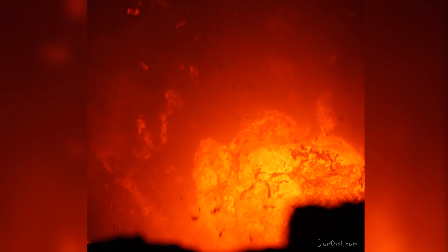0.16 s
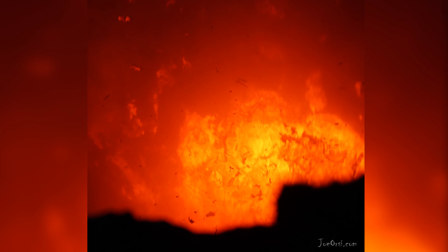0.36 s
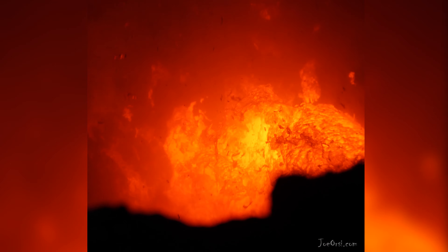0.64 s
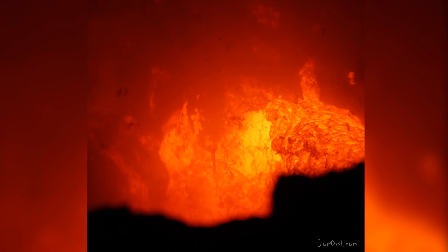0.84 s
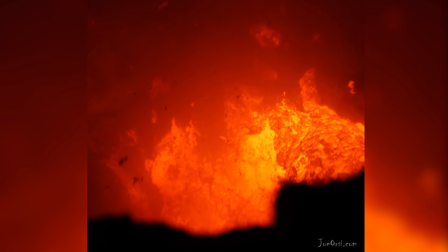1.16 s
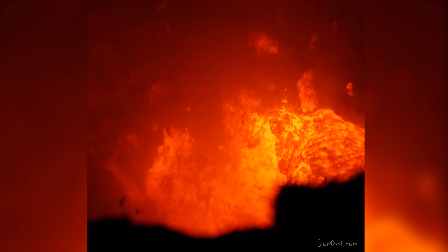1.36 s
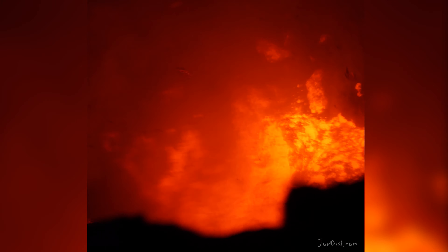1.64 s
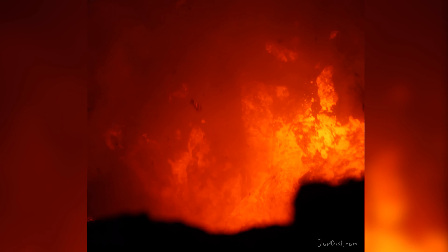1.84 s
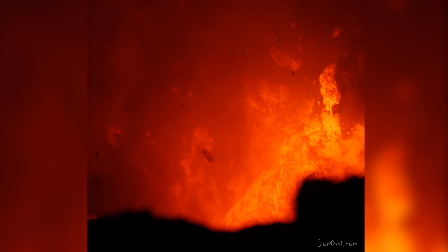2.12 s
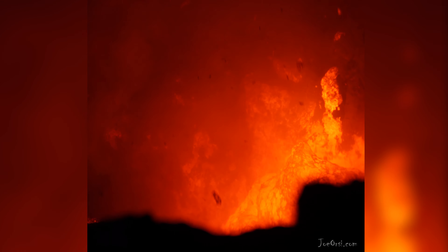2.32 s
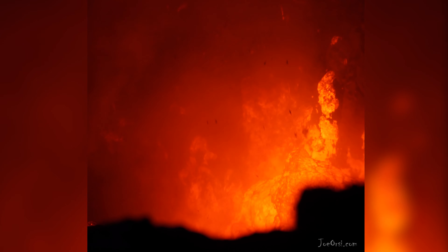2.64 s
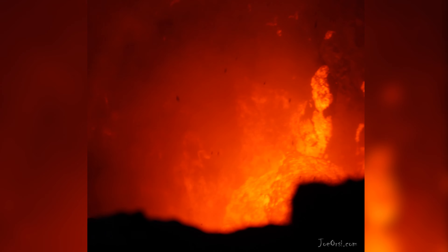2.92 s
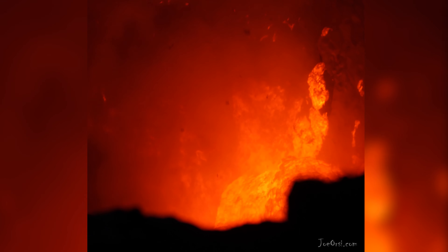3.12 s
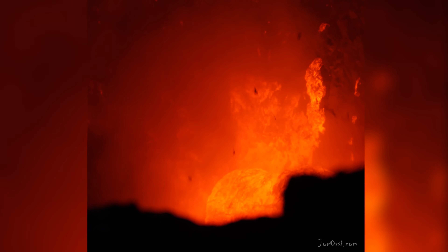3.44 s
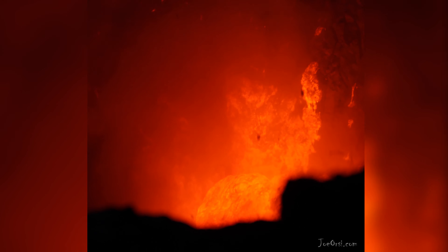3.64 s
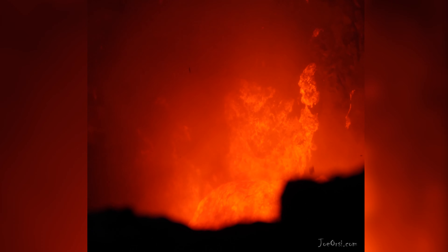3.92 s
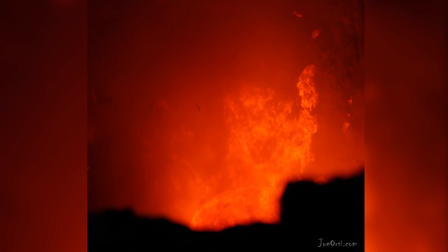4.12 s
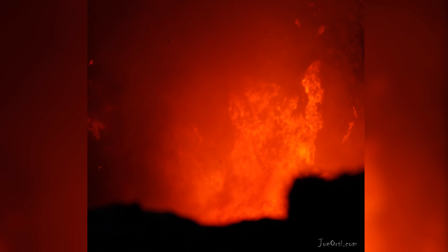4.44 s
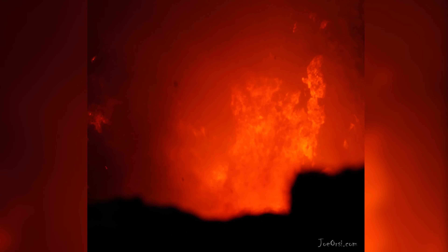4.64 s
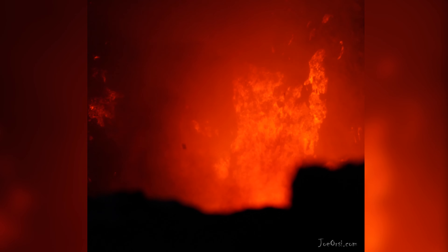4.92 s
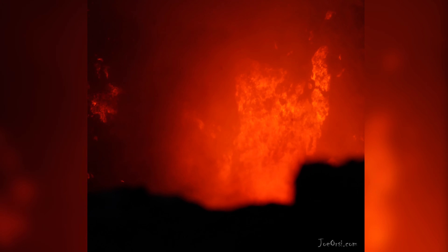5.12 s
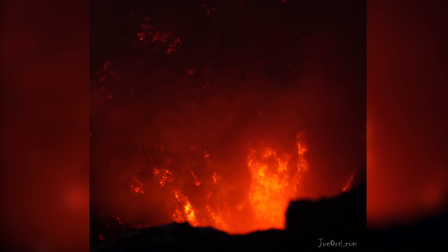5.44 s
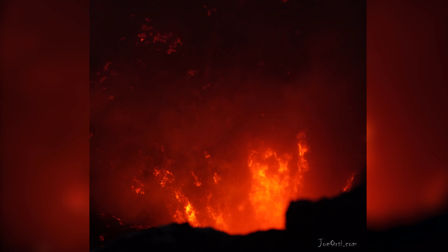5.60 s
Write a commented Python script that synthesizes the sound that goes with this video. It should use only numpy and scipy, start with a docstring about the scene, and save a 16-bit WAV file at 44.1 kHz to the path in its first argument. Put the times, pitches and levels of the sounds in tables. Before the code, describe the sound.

Lava boils in a crater a short way from a stereo microphone, rumbling steadily under surges of roaring, hissing gas. Clusters of deep booms and smaller gulps break through, with wet spatter, clacking cinders and faint crunching crust. The vent eases briefly late on as wind gusts thump the left side, then the bubbling and splatting pick up again.

```python
"""Close to a boiling lava vent

The crater rumbles a short way from a stereo microphone, and wind buffets both ports. Big gas bubbles
burst with booms and small ones with gulps, echoing off the walls. Escaping gas roars and hisses, and its
surges throw up spray. Wet clots splat down, cinders clack on the rock, crust crunches and ash ticks."""
import sys
import numpy as np
from scipy import signal
from scipy.fft import rfft, irfft, next_fast_len
from scipy.io import wavfile
from scipy.ndimage import map_coordinates

SR = 44100
rng = np.random.default_rng(int(sys.argv[2]) if len(sys.argv) > 2 else 0)


def waveform_to_disk(signal):
    """Save audio, clipped to [-1, 1], as 16-bit WAV at the path in sys.argv[1]."""
    frames = np.transpose(np.atleast_2d(signal))
    scaled = np.clip(frames, -1, 1) * 32767
    samples = np.round(scaled).astype(np.int16)
    wavfile.write(sys.argv[1], SR, samples)


N = 254456


def amp(db):
    """Decibels to gain."""
    return 10 ** (np.asarray(db) / 20)


def unit(x):
    """x at rms 1."""
    return x / np.sqrt(np.mean(x ** 2) + 1e-20)


def together(gains):
    """The joint strength of unrelated sounds: their powers sum."""
    return np.sqrt(sum(gain ** 2 for gain in gains))


def along(points, hz):
    """(Hz, value) points read on a log axis."""
    freqs, values = np.transpose(points)
    return np.interp(np.log(hz + 1), np.log(freqs + 1), values)


def shaped(x, spectrum):
    """x filtered by a curve of (Hz, dB) points."""
    size = next_fast_len(N + SR // 2)
    gain = amp(along(spectrum, np.fft.rfftfreq(size, 1 / SR)))
    return irfft(rfft(x, size) * gain, size)[..., :N]


def butter(x, hz, kind, order=2):
    """x through a low-, high- or band-pass filter."""
    return signal.sosfilt(signal.butter(order, hz, kind, fs=SR, output="sos"), x)


def noise(spectrum):
    """Two unrelated noises with this spectrum, at rms 1."""
    return unit(shaped(rng.standard_normal((2, N)), spectrum))


def spread(pair, side_db):
    """Two unrelated signals as the centre and the width of a stereo sound."""
    side = amp(side_db) * pair[1]
    return unit(np.array([pair[0] + side, pair[0] - side]))


def wobble(per_s):
    """A smooth random curve with per_s knots a second."""
    knots = rng.standard_normal(int(N * per_s / SR) + 4)
    return map_coordinates(knots, [np.arange(N) * per_s / SR])


def patter(per_s, scatter_db):
    """Two streams of tiny impacts at random times and of uneven size."""
    hits = (rng.random((2, N)) < per_s / SR) * rng.standard_normal((2, N))
    return unit(hits * amp(scatter_db * rng.standard_normal((2, N)).clip(-2, 2)))


def hump(peak_s, length_s):
    """A smooth rise to 1 and the fall after it."""
    return np.exp(-(2 * (np.arange(N) / SR - peak_s) / length_s) ** 2)


def swell(t, length_s, order):
    """An envelope that peaks at half the length, then dies; a higher order starts more softly."""
    u = 2 * t / max(length_s, .004)
    return (u * np.exp(1 - u)) ** order


def add(track, start_s, sound):
    """Mix a sound into a track."""
    part = track[..., max(round(start_s * SR), 0):][..., :sound.shape[-1]]
    part += sound[..., :part.shape[-1]]


# Churning lava, heard from close by: frequency_hz, level_db
RUMBLE_SPECTRUM = [(15, -46.5), (28, -26.5), (50, -14.5), (70, -5), (88, 0), (108, -2), (130, -2.5),
                   (200, -8.5), (290, -10), (450, -24.5), (900, -55.5), (2000, -100)]
def rumble():
    """Lava churns in the crater with a low, uneven rumble and settles briefly near the end."""
    level_db = -25 - 4.5 * hump(peak_s=4.81, length_s=0.77) + 0.99 * wobble(13)
    return amp(level_db) * spread(noise(RUMBLE_SPECTRUM), side_db=-6.5)


# Gas flow at the mouth of the vent: time_s, level_db
GAS_FLOW = [(0.0, -32), (0.42, -31), (.685, -29), (.705, -33), (0.87, -30.5), (1.0, -29), (1.15, -32),
            (1.58, -31.5), (1.8, -27), (2.0, -29.5), (2.4, -28.5), (2.77, -29.5), (2.82, -35), (3.3, -32.5),
            (3.56, -34), (3.66, -38), (3.9, -40), (4.21, -35), (4.69, -43.5), (5.18, -39.5), (5.26, -32),
            (5.4, -36), (5.77, -33.5)]
# The tone of its roar: frequency_hz, level_db
ROAR_SPECTRUM = [(60, -40.5), (150, 1.5), (260, 0), (400, -2), (600, -5.5), (900, -11), (1500, -19),
                 (2500, -30.5), (5000, -82.5)]
def roar(puffs):
    """Escaping gas roars in puffs, louder as the flow grows."""
    level_db = flow_db(np.arange(N) / SR) + 5.5 + 0.59 * puffs
    return amp(level_db) * spread(noise(ROAR_SPECTRUM), side_db=-3)


def flow_db(time_s):
    """The strength of the gas flow at a given time."""
    return np.interp(time_s, *np.transpose(GAS_FLOW))


def surge(crest_s, growth_db_per_s, choke_db_per_s=401.5):
    """Gas pressure builds or holds nearly level up to a crest, then the vent chokes."""
    t = np.arange(N) / SR - crest_s
    return amp(np.minimum(growth_db_per_s * t, -choke_db_per_s * t))


def blast(start_s, hold_s, release_db_per_s, attack_s=0.027):
    """A tear opens quickly, holds while gas escapes, and closes at its own speed."""
    t = np.maximum(np.arange(N) / SR - start_s, 0)
    return np.minimum(t / attack_s, 1) * amp(-release_db_per_s * np.maximum(t - hold_s, 0))


# Surges in the vent: crest_s, spray_db, growth_db_per_s
GAS_SURGES = [(0.688, -44.5, 3), (2.79, -56, -1.5), (3.53, -49.5, 28.5), (4.24, -58.5, 46.5),
              (4.37, -61.5, 19), (5.76, -51.5, 12.5)]
# Blasts through fresh tears in the lava: start_s, hold_s, release_db_per_s, spray_db, hiss_db
GAS_BLASTS = [(0.12, 0.45, 110, -50, -73.5), (0.884, 1.39, 46, -45, -68), (0.892, 0.16, 300, -43.5, -61.5),
              (0.972, 0.025, 396, -45, -59), (1.167, 0.17, 123, -60.5, -65.5),
              (1.72, 0.12, 294, -45, -62.5), (1.893, 0.21, 62.5, -54, -66), (2.487, .12, 67.5, -55, -77),
              (3.515, 0.035, 106, -48, -84), (4.15, .08, 119.5, -59, -81.5), (5.214, 0.04, 65, -53, -94),
              (5.342, 0.042, 60, -46.5, -74.5)]
# Spray over the vent: frequency_hz, level_db
SPRAY_SPECTRUM = [(250, -24.5), (700, 3.5), (1200, 0.5), (1800, -4.5), (2600, -11), (3600, -18.5),
                  (5000, -30), (7000, -46.5), (10000, -67.5), (12000, -76)]
def spray(puffs):
    """Gas tears drops off the lava: a drizzle in the steady flow, more in surges and blasts."""
    drizzle = amp(-32.5 + 0.73 * flow_db(np.arange(N) / SR))
    surges = [amp(db) * surge(crest_s, growth) for crest_s, db, growth in GAS_SURGES]
    blasts = [amp(db) * blast(*timing) for *timing, db, _ in GAS_BLASTS]
    thrown = together([drizzle] + surges + blasts) * amp(10.5 + 0.25 * puffs + 0.95 * wobble(70))
    drops = patter(per_s=5000, scatter_db=-1) + 0.88 * rng.standard_normal((2, N))
    return thrown * spread(shaped(drops, SPRAY_SPECTRUM), side_db=-3.5)


# Gusts at the microphone: peak_s, level_db, length_s, left_over_right_db
WIND_GUSTS = [(2.608, -41.5, 4.7, 7), (4.581, -28, 0.43, 9.5), (4.97, -29.5, 0.29, 17.5)]
# Buffeting on its ports: frequency_hz, level_db
BUFFET_SPECTRUM = [(15, -41), (40, -13.5), (80, 7.5), (130, -3), (250, -2.5), (800, -82), (3000, -130)]
def wind(breeze_db=-42):
    """A breeze buffets each port on its own; the gusts strike the left one harder."""
    gusts = [amp([[db + pan_db / 2], [db - pan_db / 2]]) * hump(peak_s, length_s)
             for peak_s, db, length_s, pan_db in WIND_GUSTS]
    lumps = amp(2.8 * np.array([wobble(24), wobble(8.2)]))
    return together([amp(breeze_db)] + gusts) * unit(lumps * noise(BUFFET_SPECTRUM))


# Gas jets at close range: frequency_hz, level_db
HISS_SPECTRUM = [(1500, -30), (3500, 4), (5500, -2), (7500, -14), (10000, -26.5), (12000, -38.5)]
def jets():
    """In each blast, gas forced through the tear hisses above the roar."""
    strength = together(amp(db + 7) * blast(*timing) for *timing, _, db in GAS_BLASTS)
    return strength * spread(noise(HISS_SPECTRUM), side_db=-3)


def bubbles(rows, waver, onset_order, puff_db):
    """A bursting bubble lets out a puff of gas and rings its cavity."""
    out, t = np.zeros(N), np.arange(SR // 4) / SR
    for start_s, db, hz, length_s, rise in rows:
        flutter = map_coordinates(rng.standard_normal(50), [t * 190], mode="mirror")
        # The pitch climbs as the skin tears open, or sinks as the cavity swells.
        glide = 1 + rise * np.tanh(2 * t / length_s - 1) + waver * flutter
        ring = np.sin(2 * np.pi * hz * np.cumsum(glide) / SR)
        puff = unit(butter(rng.standard_normal(len(t)), [1.3 * hz, 2 * hz], "band"))
        add(out, start_s, amp(db) * swell(t, length_s, onset_order) * (ring + amp(puff_db) * puff))
    return butter(out, 2200, "low", order=3)  # the bubbles carry no bright edge


def gurgle(count=40):
    """Lesser bubbles pop at random, as loud as the gas flow allows."""
    when, faintness, pitch, life, bend = rng.random((count, 5)).T
    start_s = when * N / SR
    level_db = flow_db(start_s) + 8 - 21.5 * faintness
    pitch_hz, length_s = 280 * 3 ** pitch, 0.0028 * (1 + life)
    rows = zip(start_s, level_db, pitch_hz, length_s, 0.18 * bend)
    return bubbles(rows, waver=0.026, onset_order=1, puff_db=-4.5)


# Big bubbles, straight ahead in the vent: start_s, level_db, pitch_hz, length_s, rise_ratio
BIG_BUBBLES = [(.173, -15, 115, .035, -.2), (.455, -13, 131, 0.048, -0.14), (.67, -13.5, 146, .03, 0.12),
               (.974, -6.5, 110.3, 0.05, -0.13), (1.01, -12, 94.3, 0.069, 0.00016),
               (1.06, -8, 99.7, 0.033, 0.17), (1.168, -9, 77.4, 0.039, 0.026),
               (1.373, -9.5, 118, 0.051, -0.13), (1.75, -11.5, 107, 0.048, 0.089),
               (1.805, -6.5, 99, 0.045, .3), (1.85, -7, 143, 0.039, 0.064), (2.041, -11, 141, 0.025, -0.26),
               (2.692, -10, 86.5, 0.019, -0.17), (2.765, -7.5, 84.4, 0.063, 0.24),
               (2.849, -11, 98, 0.026, -0.12), (3.588, -7.5, 82.2, 0.067, .28),
               (3.818, -13.5, 98.5, 0.025, -0.11), (3.87, -13, 97.6, 0.049, 0.19),
               (4.254, -7, 121, 0.042, -0.31), (4.338, -7.5, 111, 0.068, -0.014),
               (4.38, -13, 104, 0.11, .03), (4.558, -14, 87, 0.035, 0.14), (5.149, -8.5, 107, 0.025, 0.089),
               (5.235, -14, 90.6, 0.078, 0.21), (5.402, -13, 122, .035, -0.29),
               (5.449, -11, 135, 0.02, 0.47), (5.685, -11, 94.3, 0.072, 0.34)]
def booms():
    """Large cavities burst open with a deep, soft-edged boom."""
    return amp(-8) * bubbles(BIG_BUBBLES, waver=0.036, onset_order=2, puff_db=-16.5)


# Small bubbles among them: start_s, level_db, pitch_hz
SMALL_BUBBLES = [(.179, -16.5, 236), (.599, -26, 610), (1.036, -14, 270.4), (1.102, -11.5, 402),
                 (1.125, -17, 390), (2.197, -18.5, 242), (2.307, -18.5, 264), (4.231, -30, 560),
                 (4.29, -23.5, 232.6), (4.314, -20, 300), (4.338, -21, 347), (4.511, -20, 354),
                 (4.511, -31, 494), (4.611, -40, 538), (4.682, -31.5, 473), (4.921, -35, 567),
                 (4.98, -23.5, 317), (5.002, -24.5, 332), (5.297, -20, 215), (5.394, -18.5, 497),
                 (5.454, -20.5, 195), (5.556, -18.5, 309), (5.561, -23, 630), (5.678, -19.5, 642)]
def gulps(cycles=4.12, rise=0.098):
    """A small cavity rings for a set number of swings, so low gulps last longer."""
    rows = [(start_s, db, hz, cycles / hz, rise) for start_s, db, hz in SMALL_BUBBLES]
    return amp(-1) * bubbles(rows, waver=0.058, onset_order=1, puff_db=-13.5)


# Echo from the crater walls: frequency_hz, t60_s
CRATER_DECAY = [(80, 0.23), (500, 0.81), (5000, 0.089)]
def crater_echo(x):
    """The walls throw back a tail in which the low middle range lasts longest."""
    hz, t, spectra = signal.stft(rng.standard_normal((2, SR // 2)), SR, nperseg=256)
    decay = amp(-60 * t / along(CRATER_DECAY, hz)[:, None])
    _, tail = signal.istft(spectra * decay, SR, nperseg=256)
    return signal.fftconvolve(x, tail / np.linalg.norm(tail[0]), axes=1)[:, :N]


# Wet clots landing nearby: start_s, level_db, length_s, pitch_hz
CLOT_LANDINGS = [(0.654, -24, 0.013, 874), (0.678, -20, 0.011, 1380), (0.889, -23, 0.038, 1500),
                 (0.986, -26, 0.11, 1290), (1.109, -22.5, 0.016, 1810), (2.534, -27.5, 0.026, 1790),
                 (3.524, -38.5, 0.03, 1700), (4.328, -36, 0.039, 1295), (4.969, -30.5, 0.05, 1290),
                 (4.995, -28.5, 0.023, 1500), (5.048, -31, 0.014, 1800), (5.078, -32.5, 0.039, 1700),
                 (5.149, -21.5, 0.02, 1020), (5.212, -24, 0.024, 1150), (5.254, -21, 0.014, 1160),
                 (5.319, -27, 0.014, 1700), (5.673, -29, 0.031, 1010)]
# The tone they share: frequency_hz, gain_db
SPLAT_SPECTRUM = [(100, -11.5), (400, 23), (2500, 9.5), (4000, -3.5), (6000, -35.5), (11000, -48.5)]
def splats():
    """A clot breaks up on landing in a short crackling slap with its own pitch."""
    out, t = np.zeros((2, N)), np.arange(SR // 4) / SR
    crackle = spread(patter(per_s=2400, scatter_db=1), side_db=-12)
    for start_s, db, length_s, hz in CLOT_LANDINGS:
        drops = np.roll(crackle, -round(start_s * SR), axis=1)[:, :len(t)]
        body = unit(butter(drops, [0.58 * hz, 1.77 * hz], "band"))
        add(out, start_s, amp(db - 24.5) * swell(t, length_s, order=2) * (body + 0.38 * drops))
    return shaped(out, SPLAT_SPECTRUM)


# Cinders striking rock to either side of the microphone: start_s, level_db, pitch_hz, ring_t60_s,
# upper_tilt_db_per_octave, left_over_right_db, crack_db, crack_top_hz
CINDER_HITS = [(0.8395, -30.5, 2600, .024, 3, 3, 22.5, 4530), (1.1295, -39, 2070, .02, -3, 2.5, 23, 5200),
               (1.9645, -23, 2850, .022, -12, -1.5, 21, 3200),
               (2.5505, -26, 2000, .045, -24, -10.5, 9.5, 2400),
               (3.7948, -29, 2330, 0.033, 7, -0.5, 12.5, 4800),
               (3.7983, -32, 2250, 0.036, 0, -0.5, 12.5, 4400),
               (4.2918, -29.5, 2160, .024, -9.5, 4, 20, 3500), (4.3195, -34.5, 2250, .05, -2, 2, 14, 6000),
               (4.3305, -40, 2300, .045, -4, -0.5, 9, 4400), (4.339, -31.5, 2250, .045, 1, 1, 13.5, 4370),
               (4.3695, -27, 2430, .05, -21, -1, 20.5, 3400), (4.861, -47, 2910, .025, 5, -5, 20.5, 6470),
               (5.147, -39, 2970, .02, -1, 6, 22, 7460)]
# A cinder's modes, the lowest the knock of its whole body: pitch_ratio, level_db, ring_time_ratio
RING_MODES = [(.27, 7, .55), (.69, 4.5, 1), (.76, -1, .9), (1, 2, 1), (1.07, -4, 1), (1.56, -2.5, .6)]
# Its first sharp contact: frequency_hz, gain_db
CRACK_SPECTRUM = [(200, -10), (1000, 1), (3000, -1), (4200, -12), (5500, -24), (7000, -43), (12000, -75)]
def cinders(attack_s=.0006, crack_t60_s=.008):
    """Cooled cinders knock and ring briefly; a hard corner cracks brightly, a blunt face only clacks."""
    rings, cracks, t = np.zeros((2, N)), np.zeros((2, N)), np.arange(SR // 8) / SR
    for start_s, db, hz, ring_s, tilt_db, pan_db, crack_db, top_hz in CINDER_HITS:
        blow = amp(db - 10) * amp([[pan_db / 2], [-pan_db / 2]])
        ring = np.zeros(len(t))
        for ratio, mode_db, life in RING_MODES:
            struck_db = mode_db + rng.normal(0, 1.5) + tilt_db * max(np.log2(ratio), 0)
            ring += amp(struck_db - 60 * t / (life * ring_s)) * np.sin(2 * np.pi * hz * ratio * t)
        crack = amp(crack_db - 60 * t / crack_t60_s) * rng.standard_normal(len(t))
        add(rings, start_s, blow * ring * (1 - np.exp(-t / attack_s)))
        add(cracks, start_s, blow * butter(crack, top_hz, "low", order=3))
    return butter(rings, 4000, "low", order=6) + shaped(cracks, CRACK_SPECTRUM)


# Brittle crust crumbling close by: start_s, level_db, length_s
CRUST_BREAKS = [(1.09, -45.5, 0.05), (3.498, -59, 0.056), (4.313, -47, 0.035), (4.956, -59, 0.04),
                (4.993, -52.5, 0.0096), (5.092, -59, 0.061), (5.157, -46, 0.011), (5.216, -48.5, 0.026),
                (5.252, -48.5, 0.025)]
# The tone of its fractures: frequency_hz, gain_db
CRUNCH_SPECTRUM = [(500, -10), (1500, 3), (3300, -2), (5000, -16), (6000, -28), (8000, -52), (12000, -75)]
def crunches():
    """Cooled crust gives way in a quick run of dry snaps."""
    out, t = np.zeros((2, N)), np.arange(SR // 8) / SR
    for start_s, db, length_s in CRUST_BREAKS:
        snaps = spread(patter(per_s=1900, scatter_db=-2)[:, :len(t)], side_db=-13.5)
        gate = np.exp(-(2 * t / length_s - 1) ** 6)
        add(out, start_s, amp(db + 9.5) * unit(snaps * gate) * np.sqrt(length_s / t[-1]))
    return shaped(out, CRUNCH_SPECTRUM)


# Ash landing right on the microphone: start_s, level_db
ASH_GRAINS = [(3.155, -51), (5.35, -50)]
def ash_ticks(t60_s=0.0202):
    """Wind-borne grains strike the housing with tiny bright ticks."""
    out, t = np.zeros((2, N)), np.arange(SR // 16) / SR
    for start_s, db in ASH_GRAINS:
        add(out, start_s, amp(db - 60 * t / t60_s) * rng.standard_normal((2, len(t))))
    return butter(out, [4500, 7500], "band")


def scene():
    """Bursts and falling lava echo over the fountain, with wind and ash at the microphone."""
    events = booms() + gulps() + gurgle() + splats() + crunches() + cinders()
    echo = amp(-19) * crater_echo(events)
    puffs = wobble(30)  # roar and spray pulse together
    fountain = rumble() + roar(puffs) + spray(puffs)
    lean = amp([[-0.11], [0.11]])  # the vent lies a touch to the right
    return events + echo + lean * fountain + jets() + ash_ticks() + wind()


def record(dry):
    """The microphone sheds the deepest bass and the top treble; a 4 ms fade ends it without a click."""
    heard = butter(dry, 28, "high")
    fade = np.minimum(np.arange(N)[::-1] / (.004 * SR), 1)
    return butter(heard * fade, 12000, "low", order=12)


dry = scene()
out = record(dry)
waveform_to_disk(out)
```